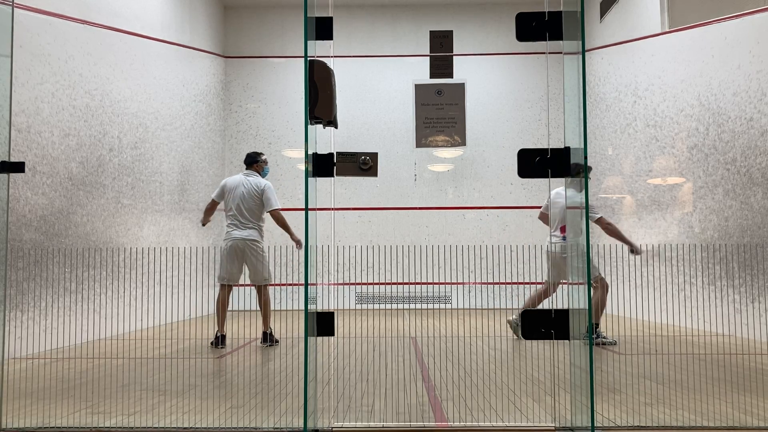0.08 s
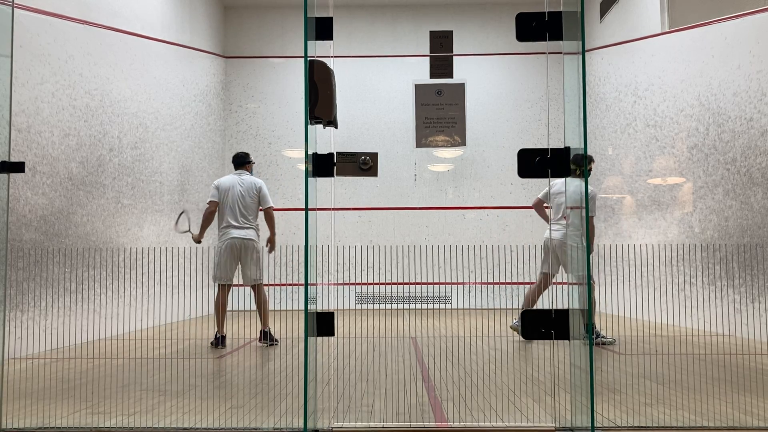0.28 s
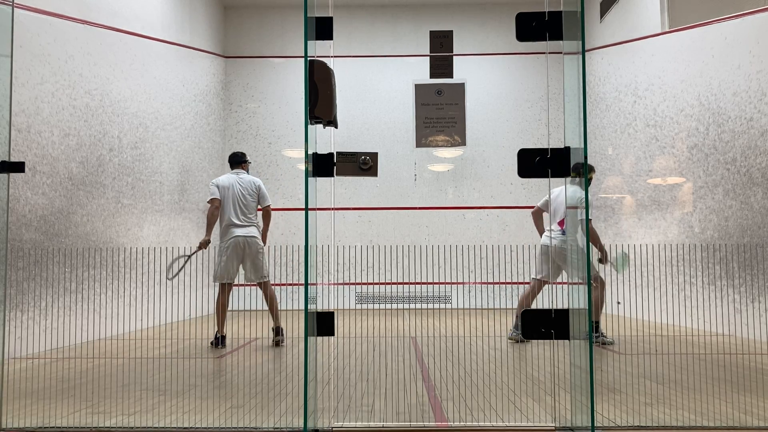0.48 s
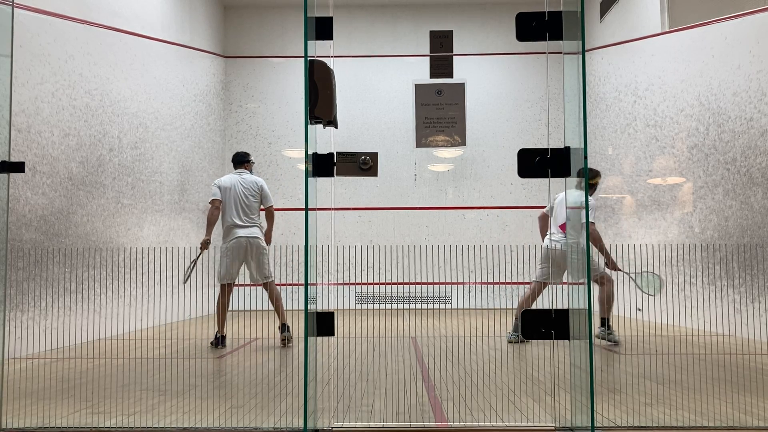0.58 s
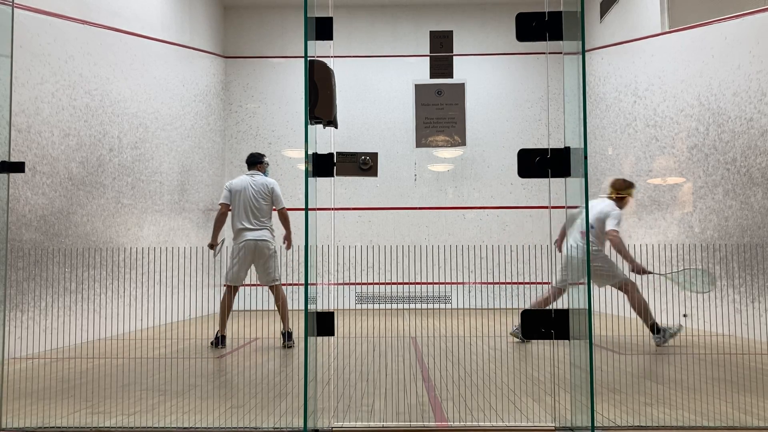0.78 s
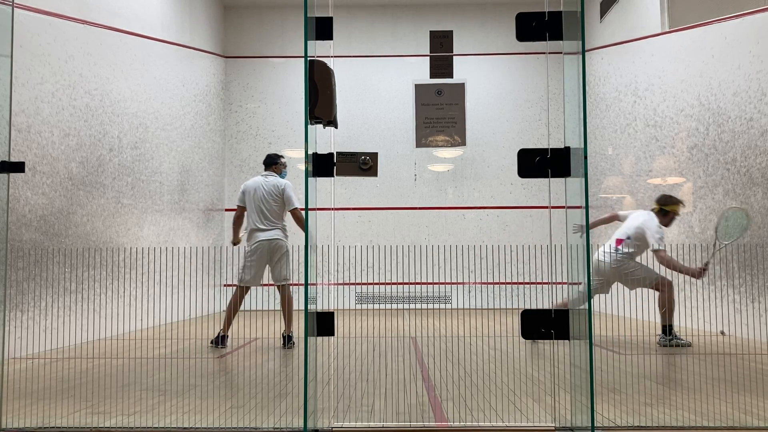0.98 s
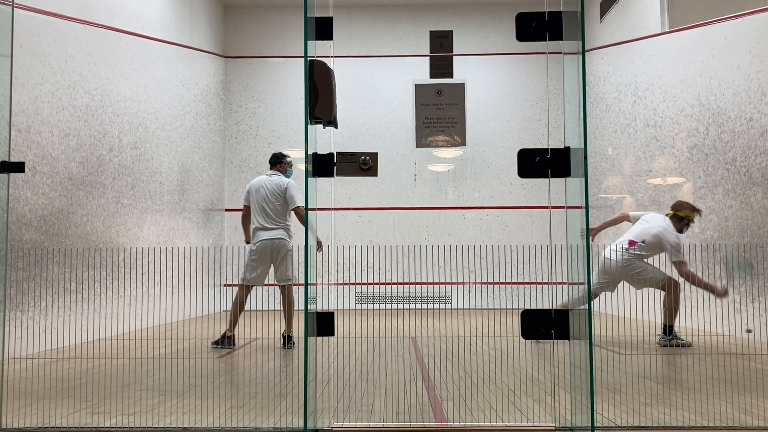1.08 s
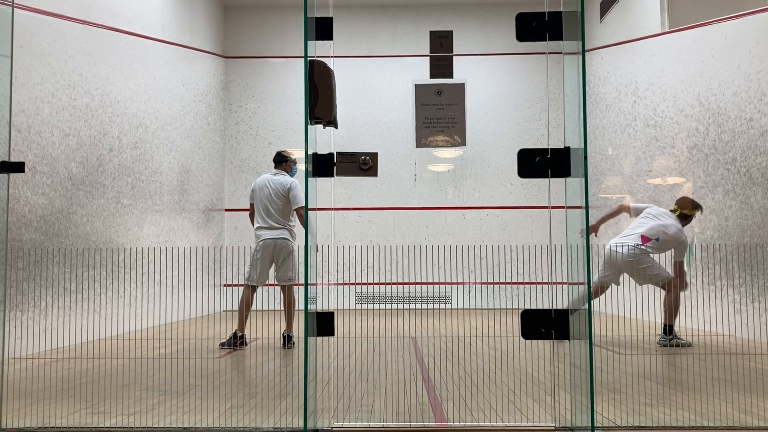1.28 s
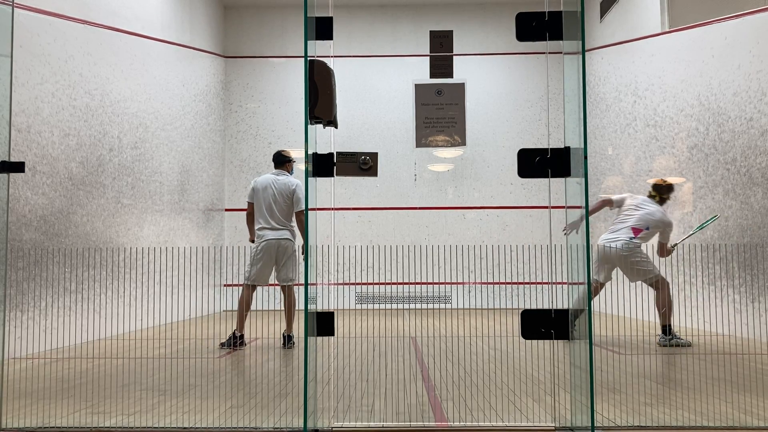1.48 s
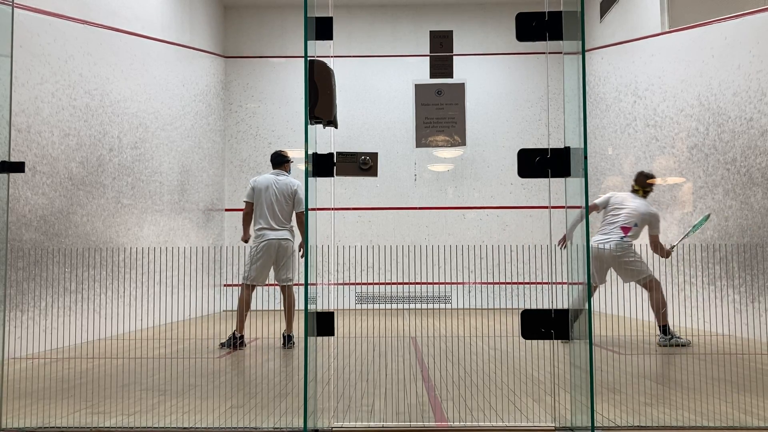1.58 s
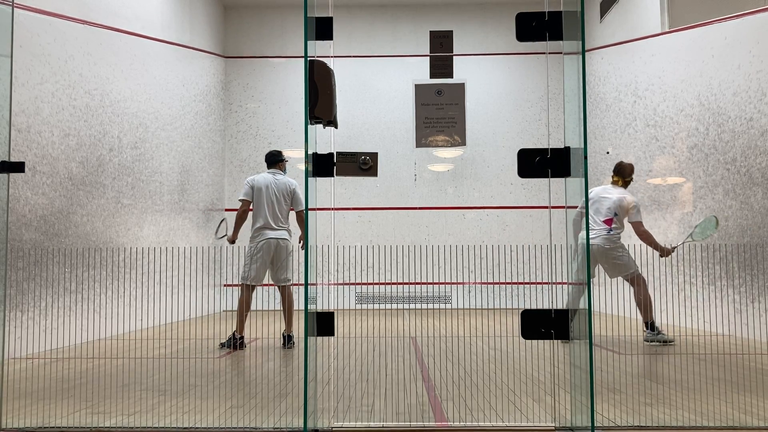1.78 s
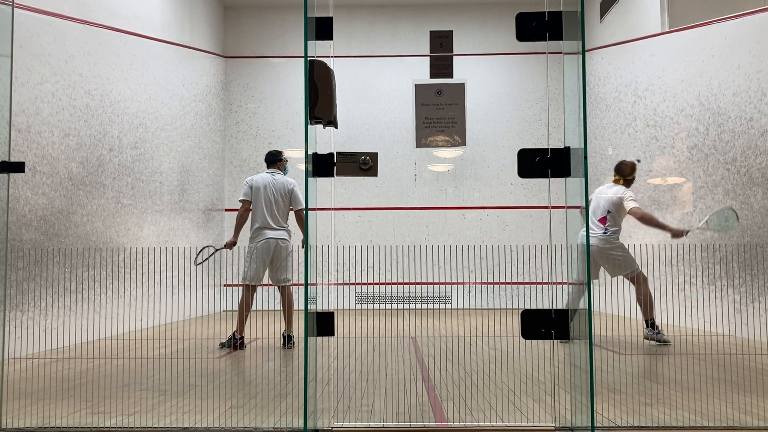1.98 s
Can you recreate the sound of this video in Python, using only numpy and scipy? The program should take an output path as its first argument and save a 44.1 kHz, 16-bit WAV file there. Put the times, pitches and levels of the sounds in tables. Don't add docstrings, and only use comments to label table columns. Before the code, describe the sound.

A squash ball is struck by a racquet and booms off a wall in an echoing court.

```python
import sys
import numpy as np
from scipy import signal
from scipy.fft import rfft, irfft, next_fast_len
from scipy.io import wavfile
from scipy.ndimage import uniform_filter1d

SR = 44100
rng = np.random.default_rng(int(sys.argv[2]) if len(sys.argv) > 2 else 0)


def output_pcm(signal):
    pcm = np.clip(np.atleast_2d(signal).T, -1, 1) * 32767
    wavfile.write(sys.argv[1], SR, np.round(pcm).astype(np.int16))


def nominal_scale(level):
    x = np.asarray(level, float) / 20
    return 10 ** x


N = 88200


def evened(x):
    return x / np.sqrt(np.mean(x ** 2) + 1e-20)


def read(points, hz):
    f, value = np.transpose(points)
    return np.interp(np.log(hz + 1), np.log(f + 1), value)


def add(mix, s, sound):
    at = round(s * SR)
    sound = sound[..., max(-at, 0):]
    part = mix[:, max(at, 0):][:, :sound.shape[-1]]
    part += sound[..., :part.shape[1]]


def colour(x, tone):
    log_gain = np.log(nominal_scale(read(tone, abs(np.fft.fftfreq(4096, 1 / SR)))))
    spectrum = np.exp(log_gain - 1j * signal.hilbert(log_gain).imag)
    taps = np.fft.ifft(spectrum).real[:2048]
    return signal.oaconvolve(x, taps[None] / np.linalg.norm(taps), axes=1)[:, :x.shape[1]]


def ring(partials, rise_s, hold_s):
    t = np.arange(SR // 2) / SR
    past = np.maximum(t - hold_s, 0)
    shape = (1 - np.exp(-t / rise_s)) * np.cos(np.pi * t) ** 2
    return -shape * sum(nominal_scale(db - 60 * past / t60) * np.sin(2 * np.pi * hz * t) for hz, db, t60 in partials)


def crack(db, tone, length_s):
    u = np.arange(4000) / SR / length_s
    noise = rng.standard_normal((2, 4000))
    return nominal_scale(db) * colour(noise * u * np.exp(1 - u ** 1.25), tone)


def room_modes():
    width_hz, spread_db = 14, 2.5
    bumps = uniform_filter1d(rng.standard_normal(N // 2 + 1), round(width_hz * N / SR))
    gain = nominal_scale(spread_db * evened(bumps))
    return gain / np.sqrt(np.mean(gain ** 2))


# f/Hz, t60/s
COURT_T60 = [(60, 0.37), (150, 1.63), (300, 1.294), (900, 2.1), (2000, 1.295), (4000, 1.07), (8000, 0.64),
             (14000, 0.54)]
SLAP_S, SLAP_DB, SLAP_FADE_DB, SLAP_LEN_S = .0425, 4, -2, .008
ECHO_DB, ECHO_SPREAD = -9, 1.8
SPARSE_S = .012


def knock(mix, row, tone, crack_tone, modes):
    s, tail_db, crack_db, rise_s, crack_s = row
    t = np.arange(N) / SR
    share = np.clip(.03 + (t / SPARSE_S) ** 2 * .1, 0, 1)
    arrives = rng.random((2, N)) < share
    taps = rng.standard_normal((2, N)) * arrives / np.sqrt(share)
    taps = irfft(rfft(taps) * modes, N)
    hz, at, z = signal.stft(taps, SR, nperseg=512)
    decay = nominal_scale(-60 * at / read(COURT_T60, hz)[:, None])
    tail = signal.istft(z * decay, SR, nperseg=512)[1][:, :N]
    slap_db = np.maximum(SLAP_DB + SLAP_FADE_DB * (t // SLAP_S - 1), 0)
    lift_db = slap_db * np.exp(-(t % SLAP_S) / SLAP_LEN_S) * (t > SLAP_S)
    out = nominal_scale(tail_db) * colour(tail * nominal_scale(lift_db) * (1 - np.exp(-t / rise_s)), tone)
    add(out, 0, crack(crack_db, crack_tone, crack_s))
    add(out, SLAP_S, crack(crack_db + ECHO_DB, crack_tone, crack_s * ECHO_SPREAD))
    add(mix, s, out)


# f/Hz, level/dB per Hz
AIR = [(15, -44), (25, 5), (121, -3), (404, -10.5), (621, -45), (879, -49), (1540, -30), (9270, -58.5),
       (15000, -78.5)]
# f/Hz, width/Hz, level/dB
DRONE = [(80.2, 6.4, -36), (112.1, 4, -43.5), (164.4, 18, -50.5)]


def ventilation():
    air_db, frames, hz = -38, N // 512 + 5, np.fft.rfftfreq(2048, 1 / SR)
    a, b, c, d, patches = rng.standard_normal((frames, 1025, 5)).T
    patches = evened(uniform_filter1d(uniform_filter1d(patches, 12, 0), 8, 1))
    z = np.array([a + 1j * b, c + 1j * d]) * nominal_scale(read(AIR, hz)[:, None] + 0.5 * patches)
    out = nominal_scale(air_db) * evened(signal.istft(z, nperseg=2048, noverlap=1536)[1][:, :N])
    fine_hz = np.fft.rfftfreq(N, 1 / SR)
    for drone_hz, width_hz, db in DRONE:
        peak = 1 / (1 + ((fine_hz - drone_hz) / width_hz) ** 2)
        noise = rng.standard_normal((2, N))
        out += nominal_scale(db) * evened(irfft(rfft(noise) * peak, N))
    return out


# t/s, tail level/dB, crack level/dB, tail rise/s, crack length/s
EARLIER_WALL = [(-.9, -12.5, -40, .01, .003)]
WALL = [(.3135, -10.5, -25, 0.0081, .012)]
# f/Hz, level/dB per Hz
WALL_TONE = [(60, -19.5), (120, -2), (260, -1.5), (900, -10.5), (2500, -13.5), (5500, -19), (10000, -15.5),
             (15000, -25)]
# f/Hz, level/dB per Hz
CRACK_TONE = [(100, -26), (500, -5), (1500, 0), (3000, -2), (7000, -6), (11000, -12), (16000, -22)]
# f/Hz, level/dB, t60/s
PANEL = [(122, -11, .06), (253, -12, .07), (479, -19, .06), (818, -19, .07)]


def wall_booms(mix, modes):
    for row in (EARLIER_WALL[0], WALL[0]):
        knock(mix, row, WALL_TONE, CRACK_TONE, modes)
    add(mix, .315, ring(PANEL, rise_s=.002, hold_s=.023))


# f/Hz, level/dB per Hz
SWISH_TONE = [(300, -6), (2500, -5), (6000, -9), (11000, -24.5), (16000, -23)]
SWISH_S = .1


def swish():
    end_db, rise_db_per_s = -47, 330
    t = np.arange(round(SWISH_S * SR)) / SR
    noise = rng.standard_normal((2, len(t)))
    return nominal_scale(end_db + rise_db_per_s * (t - t[-1])) * colour(noise, SWISH_TONE)


# t/s, tail level/dB, crack level/dB, tail rise/s, crack length/s
RACQUET = [
    (0.16, -23, -28, 0.017, 0.0036),
    (1.6142, -29, -35, 0.0055, 0.0081),
]
# f/Hz, level/dB per Hz
RACQUET_TONE = [(60, -13), (150, 1.5), (400, -4.5), (1200, -8.5), (2500, -15.5), (5500, -24.5), (9000, -27),
                (15000, -33)]


def first_strike(mix, modes):
    add(mix, RACQUET[0][0] - SWISH_S, swish())
    knock(mix, RACQUET[0], RACQUET_TONE, CRACK_TONE, modes)


# t/s, tail level/dB, crack level/dB, tail rise/s, crack length/s
SHOES = [
    (.660, -27, -57, .02, 0.0025),
    (.745, -34, -45, 0.013, 0.0045),
    (1.672, -44, -36, 0.0081, .005),
    (0.98, -61, -56, 0.0022, 0.0041),
    (1.190, -70, -64, .01, .003),
    (1.233, -58, -61, 0.017, .003),
    (1.99, -68, -70.5, 0.0045, 0.0029),
]
# f/Hz, level/dB per Hz
THUD_TONE = [(60, -0.5), (250, 3.5), (900, 0), (2500, -10.5), (6000, -28), (15000, -50)]
# f/Hz, level/dB per Hz
KNOCK_TONE = [(100, -14), (400, -3), (1100, 0), (3000, -7), (5000, -19), (9000, -24), (16000, -34)]
# f/Hz, level/dB per Hz
SCUFF_TONE = [(60, -38), (1000, -8.5), (4000, -31), (9000, -6), (15000, -8.5)]


def shoes(mix, modes):
    for row in SHOES[:3]:
        knock(mix, row, THUD_TONE, KNOCK_TONE, modes)
    for row in SHOES[3:]:
        knock(mix, row, SCUFF_TONE, SCUFF_TONE, modes)


# t/s, level/dB
STEPS = [(0.721, -32), (0.881, -29), (0.981, -31.5), (1.38, -43), (1.46, -38), (1.653, -28.5),
         (1.839, -31.5)]
# f/Hz, level/dB, t60/s
SPRUNG = [(81.5, 0.5, .5), (123.1, -4, 0.73), (215.6, -6, 0.51)]


def footfalls(mix):
    for s, db in STEPS:
        add(mix, s, nominal_scale(db) * ring(SPRUNG, rise_s=0.0095, hold_s=0.021))


# t/s, tail level/dB, crack level/dB, tail rise/s, crack length/s
FLOOR = [(1.268, -31.5, -27, 0.0081, 0.0014)]
# f/Hz, level/dB per Hz
FLOOR_TONE = [(60, -14), (150, -4), (300, 2), (900, -11), (2500, -22), (5500, -28.5), (10000, -25.5),
              (15000, -40)]
# f/Hz, level/dB per Hz
TICK_TONE = [(100, -36), (1000, -17), (4500, -12), (7000, -1), (11000, 0), (16000, -12)]
# f/Hz, level/dB, t60/s
BOARDS = [(235, -35, .2), (268, -32, .25), (340, -35, .2), (420, -36, .15), (510, -39, .12)]


def floor_bounce(mix, modes):
    knock(mix, FLOOR[0], FLOOR_TONE, TICK_TONE, modes)
    add(mix, FLOOR[0][0] + 0.0045, ring(BOARDS, rise_s=0.0024, hold_s=0.046))


# f/Hz, level/dB per Hz
SECOND_TONE = [(60, -20.5), (150, 3), (400, -3.5), (1200, -12), (2500, -21), (5500, -32.5), (9000, -34.5),
               (15000, -37)]
# f/Hz, level/dB, t60/s
STRINGS = [(330, -30, .12), (436, -28, .07), (1044, -29, .06), (1500, -33, .04), (2013, -36, .04),
           (3050, -41, .03)]
# t/s, level/dB
RATTLE = [(1.6185, -36), (1.6255, -38), (1.638, -35), (1.700, -43), (1.903, -61)]


def second_strike(mix, modes):
    knock(mix, RACQUET[1], SECOND_TONE, KNOCK_TONE, modes)
    add(mix, RACQUET[1][0], ring(STRINGS, rise_s=0.0015, hold_s=0.0044))
    for s, db in RATTLE:
        add(mix, s, crack(db, TICK_TONE, length_s=0.00047))


def scene():
    mix = ventilation()
    modes = room_modes()
    wall_booms(mix, modes)
    first_strike(mix, modes)
    shoes(mix, modes)
    footfalls(mix)
    floor_bounce(mix, modes)
    second_strike(mix, modes)
    return mix


def roll_off(x):
    return signal.sosfilt(signal.butter(12, 17070, fs=SR, output="sos"), x)


# f/Hz, likeness 0 to 1
SAME = [(60, 1), (250, 0.97), (600, 0.2), (1300, .35), (5600, 0.18), (6500, 0.91), (16000, 1)]
# f/Hz, phase/rad
LOW_TURN = [(60, 0), (800, 0.55), (1400, -1.71), (3000, -1.34), (5000, -0.74)]
# f/Hz, left minus right/dB
LEAN = [(60, -1), (150, -3.5), (380, 0), (950, 1), (2380, 3), (5980, -0.5), (15000, -1)]
# f/Hz, width/Hz, level/dB
RESONANCES = [(630, 85, -11), (820, 60, 3), (960, 50, 2), (1440, 90, 4), (2230, 100, 2)]


def record(dry):
    in_step_hz, turn_hz = 6900, 4600
    shared_hz, blend_hz = 4900, 500
    low_edge_hz, high_edge_hz, ceiling = 48, 16050, 1.1
    size = next_fast_len(N + 4096)
    hz = np.fft.rfftfreq(size, 1 / SR)
    a, b = rfft(dry, size)
    high = (1 + np.tanh((hz - shared_hz) / blend_hz)) / 2
    delay = np.exp(-2j * np.pi * (hz - in_step_hz) / turn_hz)
    low_turn = np.exp(1j * read(LOW_TURN, hz))
    link = np.clip(read(SAME, hz), 0, 1) * (high * delay + (1 - high) * low_turn)
    left = link * a + np.sqrt(abs(1 - abs(link) ** 2)) * b
    resonance_db = sum(db * np.exp(-((hz - at_hz) / width_hz) ** 2) for at_hz, width_hz, db in RESONANCES)
    low_cut_db = -20 * np.log10(1 + (low_edge_hz / (hz + 1)) ** 3)
    high_cut_db = -60 * np.clip((hz - high_edge_hz) / 300, 0, 1)
    lean_db = read(LEAN, hz)
    pair = np.array([left * nominal_scale(lean_db / 2), a * nominal_scale(-lean_db / 2)])
    pair = irfft(pair * nominal_scale(resonance_db + low_cut_db + high_cut_db), size)[:, :N]
    return roll_off(ceiling * np.tanh(pair / ceiling))


dry = scene()
out = record(dry)
output_pcm(out)
```